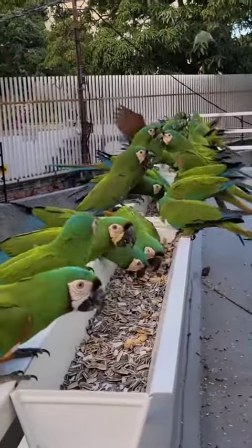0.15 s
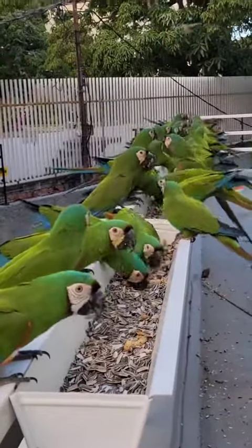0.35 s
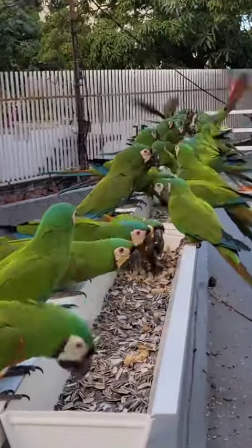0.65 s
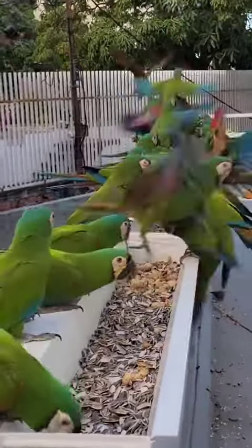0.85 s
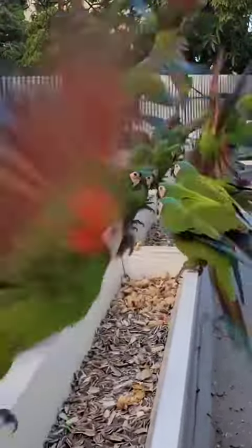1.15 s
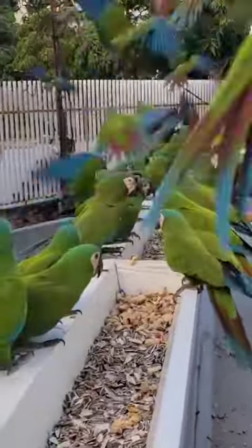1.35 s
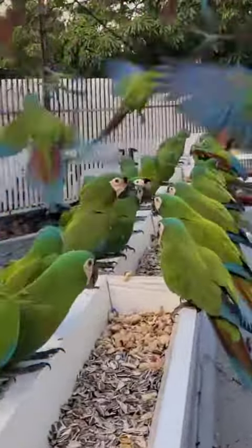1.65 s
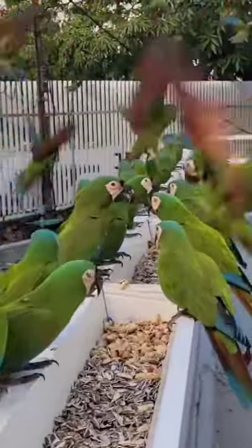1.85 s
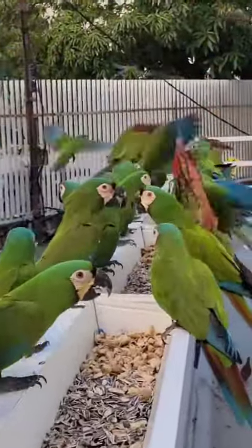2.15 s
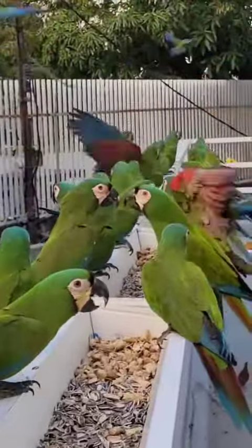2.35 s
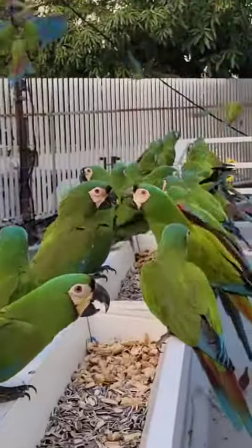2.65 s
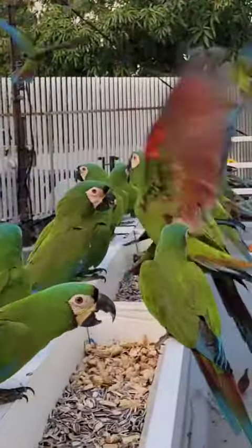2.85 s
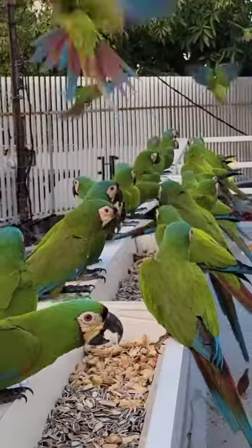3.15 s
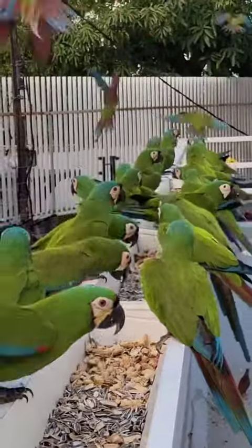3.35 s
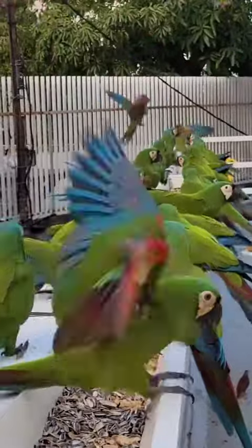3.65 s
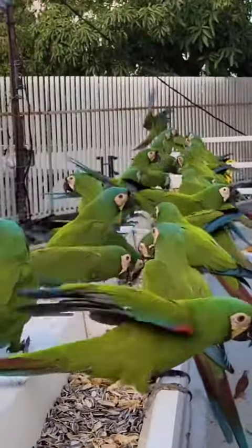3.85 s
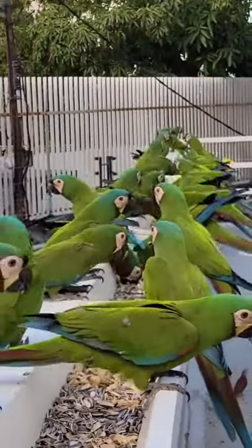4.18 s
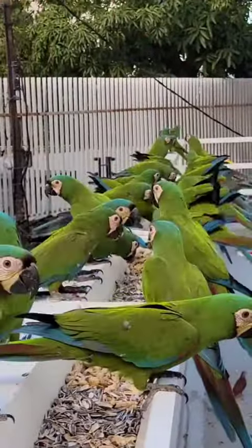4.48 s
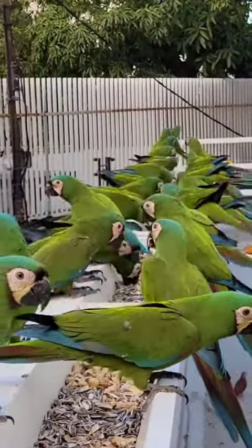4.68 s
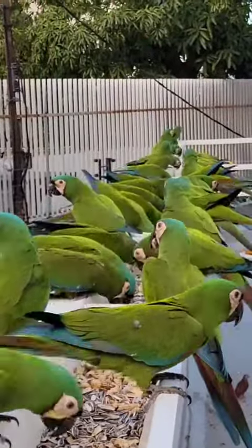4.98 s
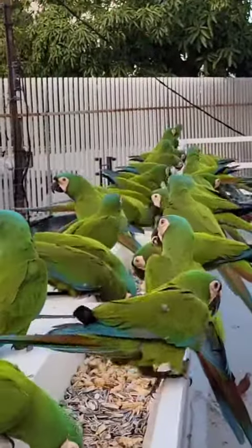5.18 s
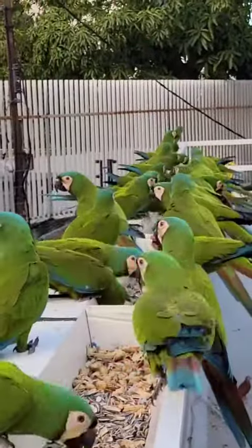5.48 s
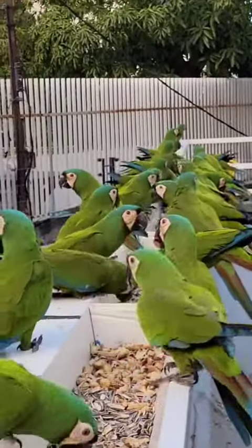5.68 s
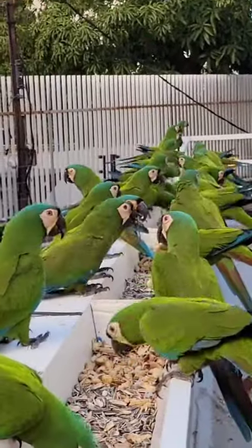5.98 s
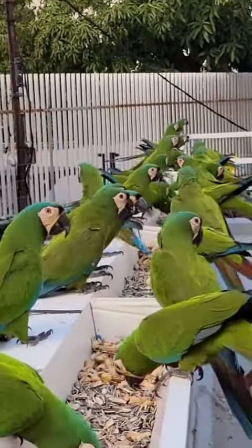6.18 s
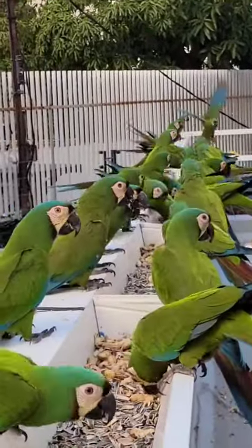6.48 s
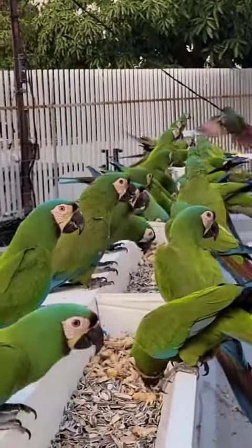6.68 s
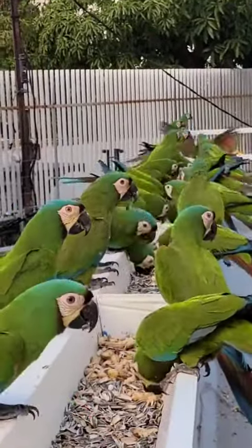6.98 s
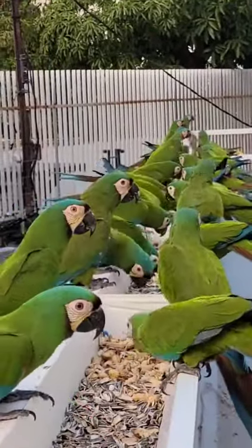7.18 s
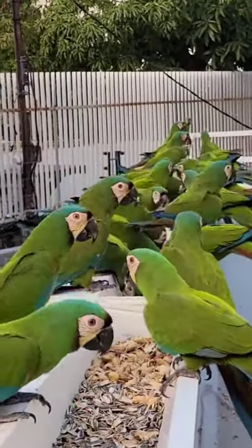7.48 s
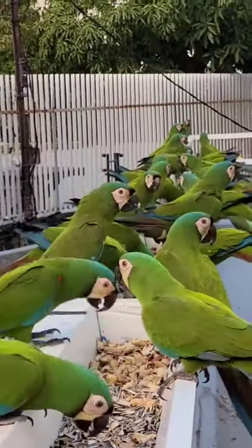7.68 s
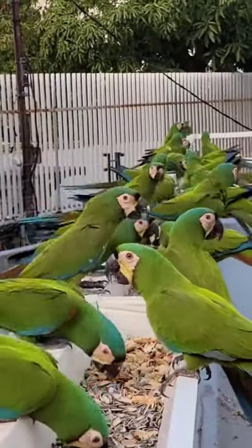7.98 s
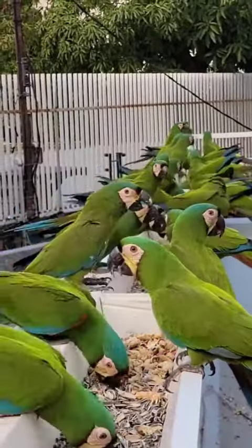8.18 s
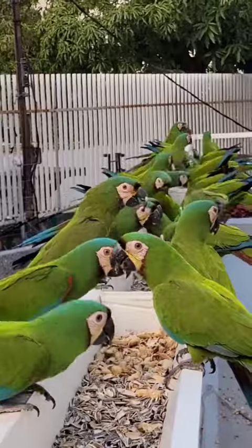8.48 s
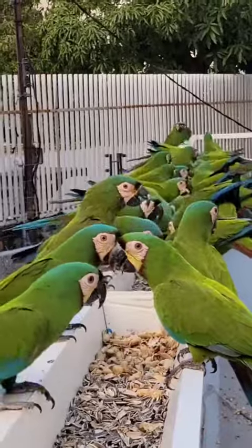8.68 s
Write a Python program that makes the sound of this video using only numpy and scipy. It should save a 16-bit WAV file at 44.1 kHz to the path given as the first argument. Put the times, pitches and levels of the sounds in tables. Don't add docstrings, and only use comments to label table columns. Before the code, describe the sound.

Close to a seed trough in a fenced yard, beaks crack seeds and husks tick over faint traffic. After about a second close wings flap and parrots burst into harsh, raspy overlapping screams. They ease, surge again near four seconds, fall back to quiet feeding and a faint engine hum, then rise to one very loud screech around seven seconds. Chatter and another weaker scream follow, with short outdoor echoes, on a nearby phone microphone.

```python
import sys
import numpy as np
from scipy import signal
from scipy.fft import rfft, irfft, next_fast_len
from scipy.io import wavfile
from scipy.ndimage import uniform_filter1d

SR = 44100
rng = np.random.default_rng(int(sys.argv[2]) if len(sys.argv) > 2 else 0)


def magnitude_from_level(level_db):
    exponent = np.asarray(level_db, float) / 20
    return 10 ** exponent


def int16_out(signal):
    q = np.round(np.clip(np.atleast_2d(signal).T, -1, 1) * 32767)
    wavfile.write(sys.argv[1], SR, q.astype(np.int16))


N = 389844

# start_s, end_s, first_db, last_db, fourth_overtone_hz
SCREAMS = [(-0.08, 0.403, -44.5, -42, 2512), (0.479, 0.795, -46, -41.5, 2490),
           (0.975, 1.204, -38.5, -46, 2540), (1.169, 1.289, -38, -22, 2623), (1.248, 1.557, -18, -17, 2650),
           (1.531, 1.814, -21, -24, 2713), (1.786, 2.128, -15, -13.5, 2660),
           (2.107, 2.319, -21, -30.5, 2623), (2.292, 2.682, -22, -39, 2674),
           (2.715, 2.949, -27, -22.5, 2563), (2.928, 3.175, -32.5, -31, 2603),
           (3.15, 3.479, -25, -27.5, 2603), (3.452, 3.771, -45.5, -25, 2660),
           (3.735, 4.07, -17.5, -17.5, 2701), (4.047, 4.349, -24, -25, 2717), (4.326, 4.58, -35, -61, 2735),
           (4.718, 5.12, -47, -52.5, 2600), (5.14, 5.55, -49.5, -49.5, 2542),
           (5.67, 6.09, -43.5, -52, 2677), (6.141, 6.518, -36, -25.5, 2816),
           (6.491, 6.792, -25.5, -18, 2692), (6.758, 7.123, -26, -33.5, 2739),
           (7.11, 7.475, -12, -13, 2711), (8.16, 8.51, -40, -19, 2860)]
# windpipe_db, middle_db, beak_db, beak_hz, pitch_glide_share
VOICES = [(-12.5, -21, -5, 3780, -.06), (-13.5, -17, -3.5, 3700, .04), (-11, -19, 0, 3800, 0.0294),
          (6, -24, 3, 4100, .03), (-4.5, -15, -1.5, 4290, .01), (-1, -5.5, -1, 4040, .04),
          (-9, -11, -6, 4000, .07), (-2, -9, -4.5, 4300, -0.0395), (-6.5, -15, -7.5, 4350, .02),
          (-4.5, -15, -13, 3640, 0.058), (-4, -13, -10, 4100, -.04), (-3, -18, -2.5, 4300, -.01),
          (-1.5, -9, 0.5, 4200, 0.058), (-3.5, -5.5, -11.5, 4400, -.02), (-9, -11, -1.5, 4670, .02),
          (-2, -1, -11, 3900, 0.035), (-10.5, -10, -4, 4160, 0.077), (-10, -9, -3, 3900, -.04),
          (-6, -3.5, -12, 4640, .09), (-13.5, -39, 3, 4700, .005), (-6, -10, -4.5, 4220, .03),
          (-5.5, -13, 1, 4450, .03), (-11, -17.5, -9.5, 4240, .03), (1, 1, -11, 4460, -.07)]
# windpipe_first_hz, windpipe_last_hz, beak_glide_share, pitch_arch_share, swell_db
MOVES = [(1300, 1430, -.04, -0.0506, -0.5), (1300, 1400, .02, 0.0303, 1.5), (1300, 1300, .03, .01, 1),
         (1250, 1230, .01, 0.014, 2.5), (1250, 1280, .02, 0.0099, 2.5), (1150, 1280, .01, 0.0102, 0.5),
         (1248, 1330, -.02, 0.0399, 3), (1305, 1360, -.02, .01, 2), (1318, 1250, -0.042, 0.0203, 5.5),
         (1123, 1370, -.02, 0.0306, 2.5), (1330, 1280, -.03, 0.0095, 2.5), (1350, 1370, -0.037, .01, 3),
         (1150, 1450, .03, -0.0203, 0.5), (1428, 1320, .07, 0.0097, 4.5), (1420, 1420, .06, 0.0103, 1.5),
         (1450, 1270, -.08, .02, 1.5), (1223, 1330, .01, 0.0395, 4), (1150, 1200, .01, -0.0202, 3.5),
         (1340, 1390, -.03, 0.0307, 10.5), (1350, 1440, .01, 0.0152, 4), (1300, 1350, .04, 0.0202, 2.5),
         (1398, 1390, .03, 0.0197, 2), (1278, 1350, .01, 0.0252, 2), (1432, 1390, -0.086, .01, 3.5)]
# frequency_hz, level_db
RASP = [(550, -22.5), (800, -8), (1500, -3), (3000, 1), (5000, -6.5), (7000, -12.5), (10000, -15.5),
        (13500, -23.5)]
# frequency_hz, decay_60db_s
ECHO = [(500, 0.23), (1300, 0.36), (2700, 0.66), (5000, 0.51), (10000, 0.26)]
# frequency_hz, level_db
AIR = [(18, -22), (118, 2.5), (800, -15), (1640, -19), (4240, -22), (6290, -35.5), (12500, -34.5),
       (13500, -51)]
# time_s, strength_db
WIND = [
    (0.0, -38),
    (0.57, -41.5),
    (1.18, -31.5),
    (2.26, -41),
    (4.97, -45),
    (5.86, -39),
    (7.53, -42.5),
    (8.47, -35.5),
    (8.57, -46),
    (8.84, -40),
]
# time_s, pitch_hz, level_db
HUM = [
    (3.9, 127.3, -53),
    (4.1, 126.9, -31.5),
    (4.434, 131.4, -46),
    (4.588, 123.6, -45),
    (4.778, 133.0, -43.5),
    (5.65, 128.1, -37.5),
    (5.8, 137.5, -64),
]
# time_s, wing_beats_db
STIR = [(0, -38.5), (.6, -41), (.95, -29.5), (1.6, -27.5), (2.4, -34), (2.66, -49), (3.15, -50),
        (3.35, -34), (3.57, -41), (3.75, -30.5), (4.3, -44), (6.15, -43), (6.38, -34), (7.05, -38.5),
        (7.3, -32.5), (7.5, -38), (8.2, -55), (8.84, -41.5)]
# start_s, length_s, level_db
SWISHES = [(.17, .12, -53), (.63, 0.055, -39), (.76, 0.13, -43), (.85, .14, -46), (0.952, 0.17, -41),
           (2.09, .1, -33), (2.282, 0.14, -34), (2.46, .08, -37), (5.36, .08, -52), (5.548, 0.11, -51),
           (5.84, .1, -47), (6.96, .14, -39), (7.467, 0.093, -45), (7.6, .1, -57), (7.74, .12, -48),
           (7.963, 0.068, -44), (8.783, .08, -49)]
# time_s, peak_db, ring_hz
CRACKS = [(0.017, -41, 3830), (0.034, -23, 4060), (0.0623, -26, 3710), (0.4798, -28, 3420),
          (0.6405, -18, 4470), (0.771, -20, 3450), (0.8744, -26, 3920), (1.05, -13, 3630),
          (1.074, -18, 3880), (2.572, -17, 9000), (2.7222, -30, 3460), (3.1722, -39, 4800),
          (3.2143, -28, 3300), (4.6433, -29, 4570), (4.738, -28, 4030), (5.367, -29, 3730),
          (5.6046, -23, 3850), (5.695, -29, 3520), (5.868, -22, 4500), (6.0372, -43, 3700),
          (7.9695, -20, 6000), (7.985, -23, 8800), (8.043, -21, 8100), (8.6832, -26.5, 4400),
          (8.733, -32, 3500), (8.7894, -28, 7900)]
# time_s, peak_db
TICKS = [(0.0976, -36), (0.1879, -32), (0.2692, -33), (0.3645, -34), (0.4273, -38), (0.7436, -39),
         (0.7944, -28), (0.8144, -28), (0.9412, -29), (0.9904, -28), (1.0344, -20), (2.3359, -16),
         (2.4711, -21), (2.7575, -27), (2.8862, -24), (3.239, -23), (3.5781, -36), (4.5259, -40),
         (4.5449, -36), (4.7075, -41), (4.7629, -40), (4.8118, -40), (5.1026, -45), (5.178, -42),
         (5.2503, -44), (5.3416, -38), (5.4146, -35), (5.4903, -42), (5.5182, -39), (5.7502, -40),
         (5.7794, -38), (7.5484, -32), (7.7856, -40), (7.9412, -45), (8.0124, -42), (8.1872, -42),
         (8.2066, -37), (8.517, -37), (8.6406, -37), (8.717, -39), (8.7539, -46), (8.8127, -37)]
# start_s, end_s, level_db, resonance_hz, roughness_share
OTHERS = [(5.65, 5.95, -39, 1330, .35), (0.4, .545, -47, 600, 0), (1.201, 1.51, -19.5, 1630, 0.7),
          (1.193, 1.31, -28, 4900, 0.04), (1.18, 1.3, -29, 3640, 0.1), (1.781, 1.978, -19, 1550, 0.98),
          (1.853, 2.068, -32, 6500, 0.58), (2.7, 2.943, -36, 1300, 0.7), (3.201, 3.48, -28, 1493, 0.87),
          (3.623, 3.707, -25.5, 1940, 0.82), (3.763, 3.864, -21, 3170, 0.7),
          (4.067, 4.341, -30.5, 5300, 0.76), (4.602, 4.803, -56, 710, .1), (5.011, 5.503, -51, 722, 0.14),
          (6.53, 6.787, -34, 850, 0.68), (7.113, 7.217, -16, 2980, 0.6), (7.02, 7.2, -39.5, 950, 0.94),
          (7.905, 8.077, -49.5, 730, .2), (8.22, 8.51, -24.5, 1700, 0.84),
          (6.247, 6.502, -34.5, 1394, 0.15), (8.165, 8.4, -49, 3200, .3), (8.17, 8.5, -28.5, 1390, 0.3),
          (5.72, 5.9, -44, 2200, 0.2), (4.73, 4.82, -51, 2900, .3), (0.26, .33, -45, 2900, .3),
          (1.42, 1.62, -26, 3200, 0.62), (3.3, 3.46, -31, 3200, .6), (6.2, 6.26, -36, 1700, .2),
          (6.77, 7.06, -33, 5340, .95), (8.138, 8.19, -38, 1380, 0.4), (8.52, 8.72, -40, 2850, 0.44),
          (2.741, 3.067, -37.5, 4100, 0.3), (2.76, 2.946, -29.5, 3410, 0.82)]
# centre_s, peak_db
FLAPS = [
    (0.779, -36),
    (0.909, -35),
    (1.005, -22),
    (1.118, -25),
    (1.213, -23),
    (1.309, -24),
    (1.4, -25),
]
# start_s, peak_db, throat_hz, length_s, pitch_hz
CHATTER = [(2.465, -37, 1330, .02, 650), (2.505, -26, 1380, 0.031, 657), (2.688, -22.5, 1580, 0.023, 774),
           (3.129, -18, 1490, 0.023, 753), (3.167, -24, 950, 0.016, 960), (3.474, -28, 1130, 0.021, 1016),
           (3.516, -30, 1103, .016, 1060), (6.135, -35, 850, .012, 265), (6.168, -32, 950, .018, 265),
           (6.212, -27, 940, 0.035, 262.5), (6.262, -25, 930, 0.025, 262), (6.3, -25, 930, .034, 261),
           (6.354, -27.5, 900, .031, 264), (7.677, -38, 750, .016, 429), (7.713, -35, 1000, 0.019, 477),
           (7.744, -32, 1150, .019, 520), (7.777, -24, 1350, 0.025, 644), (7.814, -23, 1240, 0.032, 651),
           (7.863, -28, 900, 0.013, 500), (7.877, -27, 1340, .02, 670)]
# resonance_hz, width_hz, level_db
MOUTH = [(2650, 1500, -9.5), (3850, 1200, -13), (7000, 3000, -24)]
# frequency_hz, level_db
PORTS = [(4000, -6), (6000, -2), (9000, -1.5), (13000, -8)]
# frequency_hz, kept_share
KEPT = [(4300, .3), (5500, .42), (7500, .25), (9500, .08), (12500, .1)]

ATTACK_S, RELEASE_S, EDGE_DB = 0.037, 0.026, -7.5
PIPE_HOLD, MIDDLE_HOLD = 0.51, 0.29
PIPE_STRAY = 0.02
BREAK_DB = 2.1
ROUGH, ROUGH_PER_DB = 0.68, 0.012
TREBLE_DB, TREBLE_PER_DB = 4, 0.09
SOFT_S_PER_DB = 0.005
ECHO_DB, ECHO_PER_DB, SMEAR_S_PER_DB = -18, 0.98, 0.007
CLEAR_WIDTH_HZ, ROUGH_WIDTH_HZ, WIDTH_SHARE = 37, 400, 0.035


def evened(x):
    return x / np.sqrt(np.mean(x ** 2) + 1e-20)


def read(points, hz):
    f, value = np.transpose(points)
    return np.interp(np.log(hz + 1), np.log(f + 1), value)


def add(mix, s, sound):
    at = round(s * SR)
    part, rest = mix[max(at, 0):], sound[max(-at, 0):]
    part[:len(rest)] += rest[:len(part)]


def colour(x, *tables):
    size = next_fast_len(len(x) + 2048)
    hz = np.fft.rfftfreq(size, 1 / SR)
    gain = magnitude_from_level(sum(read(points, hz) for points in tables))
    return irfft(rfft(x, size) * gain, size)[:len(x)]


def wander(count, hz):
    b, a = signal.butter(2, hz, fs=SR)
    return evened(signal.lfilter(b, a, rng.standard_normal(count + 4000))[4000:])


def patchy(x, depth_db):
    z = signal.stft(x, nperseg=512)[2]
    patches = uniform_filter1d(rng.standard_normal(z.shape), size=5, axis=0)
    patches = evened(uniform_filter1d(patches, size=11, axis=1))
    return evened(signal.istft(z * magnitude_from_level(depth_db * patches), nperseg=512)[1][:len(x)])


def resonate(x, hz, width, out_hz=None):
    turn = np.exp(2j * np.pi * np.cumsum(hz * np.ones(len(x))) / SR)
    r = np.exp(-np.pi * width / SR)
    swing = signal.lfilter([1], np.convolve([1, -r], [1, -r]), x / turn)
    if out_hz is not None:
        turn = np.exp(2j * np.pi * np.cumsum(out_hz) / SR)
    return evened((turn * swing / (abs(swing) + 1e-9) ** 0.35).real)


def syrinx(pitch_hz, rough):
    count, rough = len(pitch_hz), np.clip(rough, 0, 1)
    jitter = (0.014 + 0.035 * rough) * wander(count, 200) + 0.016 * wander(count, 25)
    turns = np.cumsum(pitch_hz * (1 + jitter)) / SR
    pulses = np.sin(33 * np.pi * turns) / (2 * np.sin(np.pi * turns) + 1e-9) - 0.5
    puffs = (0.14 + np.exp(-(turns % 1) / 0.88)) * rng.standard_normal(count)
    flap_phase = np.pi * np.cumsum(140 * (1 + 0.17 * wander(count, 40))) / SR
    flap = 1 - (0.5 + 0.5 * rough) * np.cos(flap_phase) ** 4
    return ((1 - rough) * evened(pulses) + rough * evened(puffs)) * flap


def shape(row, voice, move):
    start, end, first_db, last_db, fourth_hz = row
    pipe_db, middle_db, beak_db, beak_hz, glide = voice
    pipe_first_hz, pipe_last_hz, beak_glide, pitch_arch, arch_db = move
    t = np.arange(0, end - start, 1 / SR)
    u = t / (end - start)
    arch = np.sin(np.pi * u)
    smear = SMEAR_S_PER_DB * abs(first_db + 15)
    opening = np.minimum(t / (ATTACK_S + smear), (t[-1] - t) / RELEASE_S)
    shut = 1 - np.minimum(opening, 1)
    throat_db = first_db + (last_db - first_db) * u + arch_db * arch + EDGE_DB * shut
    swell_db = throat_db - (first_db + last_db) / 2 - arch_db / 2
    fourth_hz = fourth_hz * (1 + glide * (u - 0.5) + pitch_arch * (arch - 2 / np.pi))
    pipe_hz = pipe_first_hz + (pipe_last_hz - pipe_first_hz) * u
    beak_hz = beak_hz * (1 + beak_glide * (u - 0.5))
    pipe_db = pipe_db - PIPE_HOLD * swell_db
    middle_db = middle_db - MIDDLE_HOLD * swell_db
    return t, throat_db, fourth_hz, pipe_db, middle_db, beak_db, pipe_hz, beak_hz


def scream(course, rough):
    t, throat_db, fourth_hz, pipe_db, middle_db, beak_db, pipe_hz, beak_hz = course
    count = len(t)
    drive = syrinx(fourth_hz / 4, rough)
    pipe_hz = pipe_hz * (1 + PIPE_STRAY * wander(count, 12.01))
    tract = [(0, fourth_hz, 600, None),
             (pipe_db, fourth_hz / 2, 480, pipe_hz),
             (middle_db, fourth_hz * 3 / 4, 480, None),
             (beak_db, beak_hz, 750, None)]
    voice = np.zeros(count)
    for k, (db, *band) in enumerate(tract):
        level = magnitude_from_level(db + BREAK_DB * wander(count, 16.6))
        voice += (-1) ** k * level * resonate(drive, *band)
    loud = np.sqrt(magnitude_from_level(2 * (beak_db - 3)) + magnitude_from_level(2 * (pipe_db - 9)) + magnitude_from_level(-23))
    treble = [(4500, 0.004), (6000, TREBLE_DB + TREBLE_PER_DB * max(throat_db.max() + 22.5, -12))]
    rasp = patchy(colour(drive + 0.9 * rng.standard_normal(count), RASP), 4)
    fade = np.sqrt(signal.windows.tukey(count, 0.024 / t[-1]))
    fade = fade * np.minimum(t / (SOFT_S_PER_DB * np.clip(-42 - throat_db[0], 0.1, 12)), 1)
    return magnitude_from_level(throat_db) * (voice + loud * colour(rasp, treble)) * fade


def fence(x):
    taps = np.zeros(SR)
    at = np.arange(400, SR - 20, 20)
    taps[at + rng.integers(0, 20, len(at))] = rng.choice([-1., 1.], len(at))
    hz, t, z = signal.stft(taps, SR, nperseg=256)
    decay = magnitude_from_level(-60 * t / read(ECHO, hz)[:, None])
    tail = signal.istft(z * decay, SR, nperseg=256)[1]
    return signal.fftconvolve(x, tail / np.linalg.norm(tail))[:N]


def still_air():
    return magnitude_from_level(-36 - 5) * patchy(colour(rng.standard_normal(N), AIR), 1.4)


def traffic():
    rumble_db = np.interp(np.arange(N) / SR, *np.transpose(WIND)) + 2.05
    a, b = rng.standard_normal((2, N))
    rumble = evened(colour(a, [(30, -14), (65, 14.5), (110, 8.5), (220, -54)]))
    gusts = evened(colour(b, [(18, -30), (30, 8.0), (45, 18), (70, -54.0)]))
    return magnitude_from_level(rumble_db - 1.5) * rumble + magnitude_from_level(2.7 * (rumble_db + 36) - 47.5) * gusts


def stirring():
    stir_db = np.interp(np.arange(N) / SR, *np.transpose(STIR))
    a, b = rng.standard_normal((2, N))
    wings = evened(colour(a, [(120, -10.0), (250, -8), (360, -9.5), (480, -13.0), (1100, -14.5),
                              (3000, -18), (9000, -50)]))
    beats = np.cos(2 * np.pi * np.cumsum(11 * (1 + 0.3 * wander(N, 4))) / SR)
    wings *= magnitude_from_level(stir_db - 5.0 + 2.4 * beats)
    rustle = patchy(colour(b, [(2500, -21), (5000, 8.5), (8000, 3.5), (11000, 4.5), (12500, 6.5)]), 2.6)
    rustle_db = -51 + (stir_db + 41)
    brush = magnitude_from_level(rustle_db - 2.5 + 2.0 * wander(N, 8))
    for s, length, db in SWISHES:
        u = np.linspace(0, 1, int(length * SR))
        add(brush, s, magnitude_from_level(db) * np.sin(np.pi * np.sqrt(u)) ** 2)
    return wings + rustle * brush * magnitude_from_level(2.3 * wander(N, 40))


def seeds():
    out, t = np.zeros(N), np.arange(1300) / SR
    snap_band = signal.butter(1, [3200, 14000], "band", fs=SR)
    snaps = signal.lfilter(*snap_band, rng.standard_normal((len(CRACKS), len(t))))
    for (s, db, hz), snap in zip(CRACKS, snaps):
        ring = 0.71 * np.sin(2 * np.pi * hz * t) * magnitude_from_level(-60 * t / 0.011)
        add(out, s, magnitude_from_level(db - 9.0) * (snap * magnitude_from_level(-60 * t / 0.029) + ring))
    tick_band = signal.butter(1, 2500, "high", fs=SR)
    ticks = signal.lfilter(*tick_band, rng.standard_normal((len(TICKS), len(t))))
    for (s, db), tick in zip(TICKS, ticks):
        add(out, s, magnitude_from_level(db - 60 * t / 0.0099) * tick)
    flurry = rng.random(N) < 40 * magnitude_from_level(5.0 * wander(N, 8)) / SR
    small = magnitude_from_level(5.1 * np.minimum(rng.exponential(1, N), 4)) * flurry
    return out + magnitude_from_level(-51.0) * signal.oaconvolve(small, snaps[0] * magnitude_from_level(-60 * t / 0.0017))[:N]


def others():
    out = np.zeros(N)
    for start, end, db, hz, rough in OTHERS:
        width = CLEAR_WIDTH_HZ + ROUGH_WIDTH_HZ * rough + WIDTH_SHARE * hz
        count = int((end - start) * SR)
        pitch_hz = hz / max(round(hz / 680), 1)
        call = resonate(syrinx(np.full(count, pitch_hz), rough), hz, width)
        add(out, start, magnitude_from_level(db + 2.0 * wander(count, 29)) * call * signal.windows.tukey(count, 0.3))
    return out


def flaps():
    out, length = np.zeros(N), 0.085
    count = int(length * SR)
    for s, db in FLAPS:
        puff = resonate(rng.standard_normal(count), 350, 140)
        add(out, s - length / 2, magnitude_from_level(db - 7) * puff * np.hanning(count))
    return out


def chatter():
    out = np.zeros(N)
    for s, db, throat_hz, length, pitch_hz in CHATTER:
        u = np.linspace(0, 1, int(max(length, 0.008) * SR))
        drive = syrinx(pitch_hz * (0.95 + 0.2 * u - 0.14 * u ** 2), 0.32)
        note = resonate(drive, throat_hz, min(740, 1.7 * pitch_hz))
        for hz, width, level_db in MOUTH + [(710, 200, -11.5)]:
            note = note - magnitude_from_level(level_db) * resonate(drive, hz, width)
        add(out, s, magnitude_from_level(db - 4) * note * np.sin(np.pi * u) ** 0.55)
    return out


def engine():
    t = np.arange(N) / SR
    s, hz, db = np.transpose(HUM)
    level = magnitude_from_level(np.interp(t, s, db, -90, -90) + 2.5)
    tone = np.sin(2 * np.pi * np.cumsum(np.interp(t, s, hz)) / SR)
    return level * tone * magnitude_from_level(3 * wander(N, 9) - 2)


def scene():
    beaks, flock = chatter() + seeds(), others()
    near = beaks + flock
    echoed = magnitude_from_level(-15.0) * beaks + magnitude_from_level(-19) * flock
    for row, voice, move in zip(SCREAMS, VOICES, MOVES):
        call = scream(shape(row, voice, move), ROUGH + ROUGH_PER_DB * voice[0])
        echo_db = min(ECHO_DB - ECHO_PER_DB * (max(row[2:4]) + 10), -6.5)
        add(near, row[0], call)
        add(echoed, row[0], magnitude_from_level(echo_db) * call)
    yard = still_air() + traffic() + stirring() + engine()
    return np.tile(near + fence(echoed) + yard + flaps(), (2, 1))


def blocks(x, width_hz, share):
    hz, t, z = signal.stft(x, SR, window="cosine", nperseg=2048)
    band = (hz // width_hz).astype(int)
    chance = rng.random((band[-1] + 1, len(t)))[band]
    kept = chance < share((band + 0.5) * width_hz)[:, None]
    return signal.istft(z * kept, SR, window="cosine", nperseg=2048)[1][:N]


def top_cut(x):
    return signal.sosfilt(signal.butter(12, 14250, fs=SR, output="sos"), x)


def record(dry):
    mid = 0.87 * np.tanh(dry[0] / 0.88)
    low_pass = signal.firwin(801, 13180, window=("kaiser", 10), fs=SR)
    mid = signal.oaconvolve(mid, low_pass, "same")
    mid = colour(mid, [(11000, 0), (12600, 5)])
    scatter = rng.standard_normal(3000) * magnitude_from_level(-60 * np.arange(3000) / 3000)
    side = colour(signal.oaconvolve(mid, scatter / np.linalg.norm(scatter))[:N], PORTS)
    side = blocks(side, 1035, lambda hz: read(KEPT, hz) * (hz > 4140))
    mid = blocks(mid, 170, lambda hz: 1 - np.clip((hz - 5000) / 22000, 0, 1))
    return top_cut(np.array([mid + side, mid - side]))


dry = scene()
out = record(dry)
int16_out(out)
```